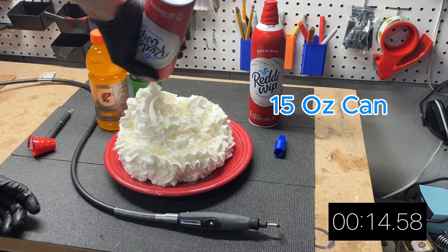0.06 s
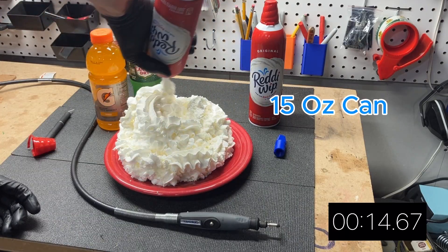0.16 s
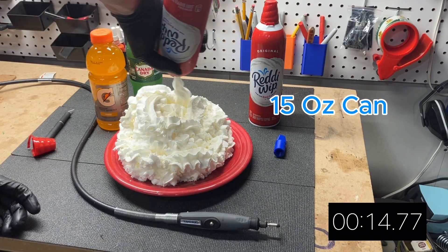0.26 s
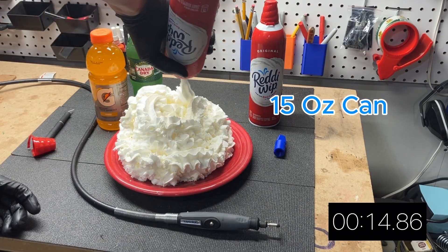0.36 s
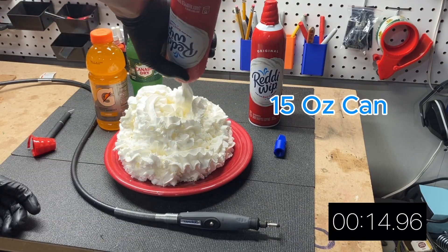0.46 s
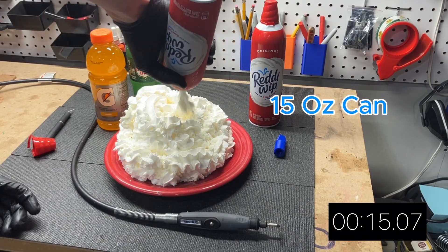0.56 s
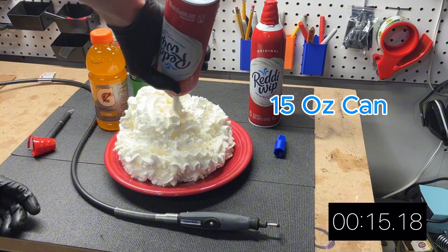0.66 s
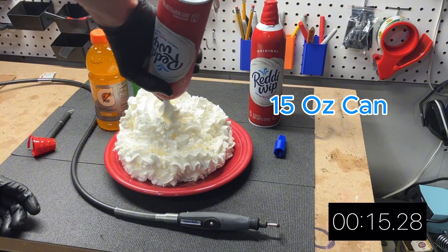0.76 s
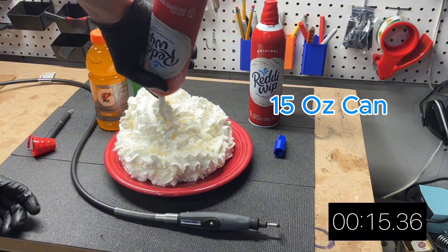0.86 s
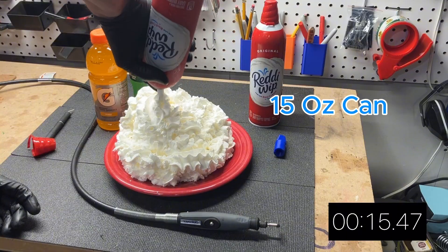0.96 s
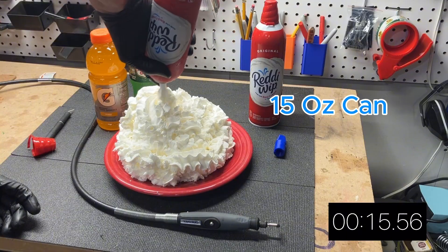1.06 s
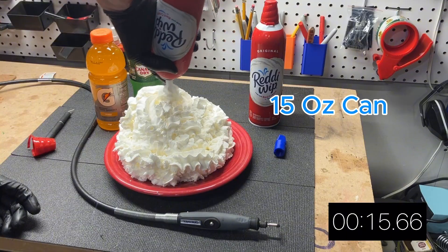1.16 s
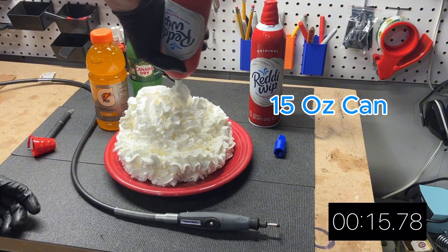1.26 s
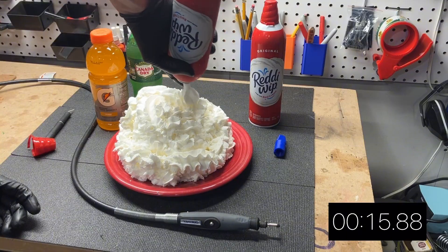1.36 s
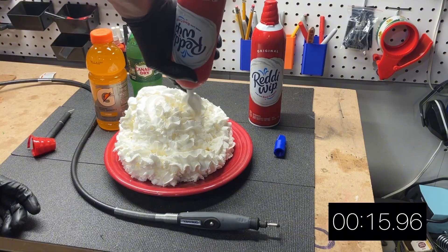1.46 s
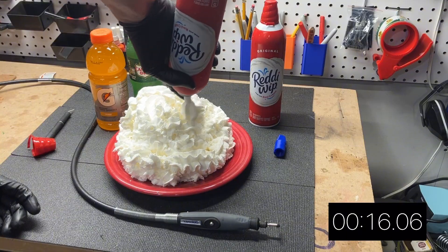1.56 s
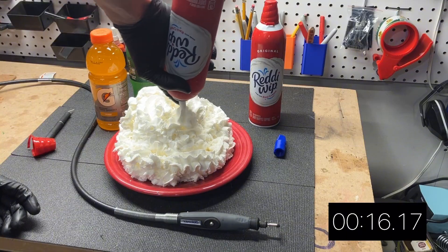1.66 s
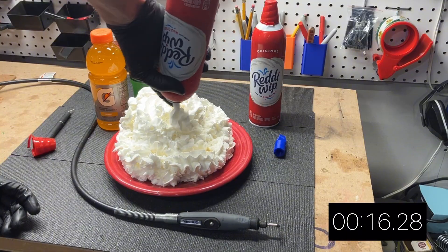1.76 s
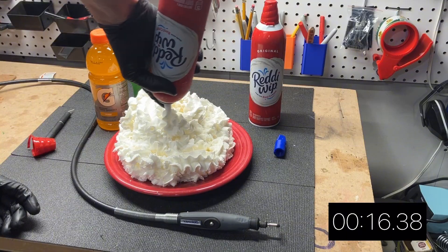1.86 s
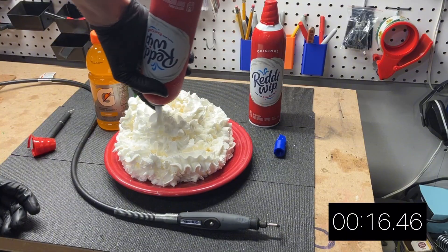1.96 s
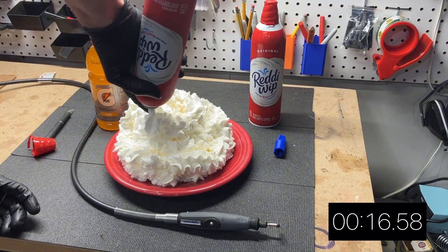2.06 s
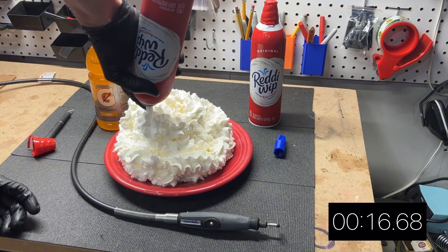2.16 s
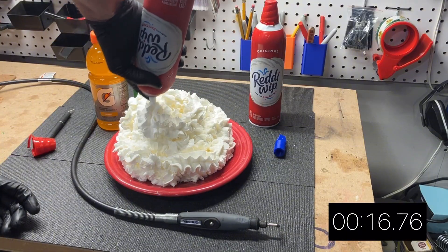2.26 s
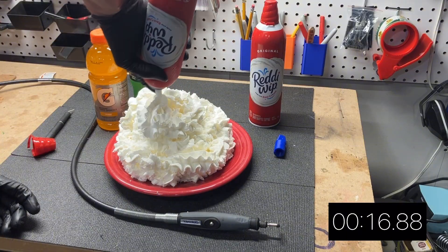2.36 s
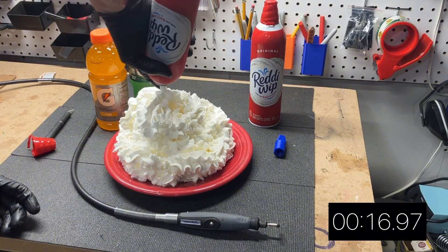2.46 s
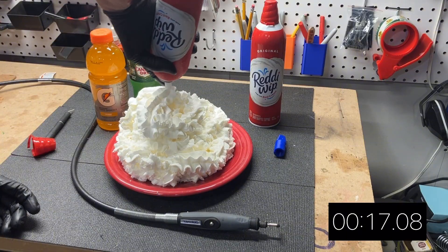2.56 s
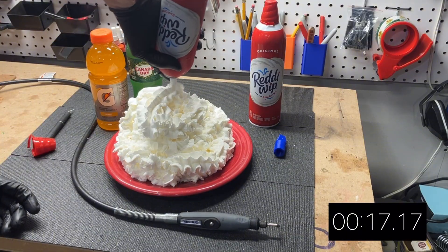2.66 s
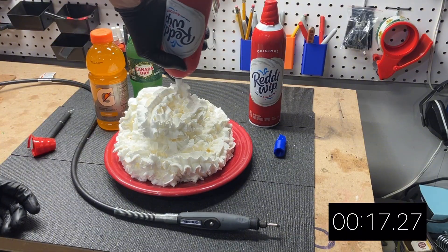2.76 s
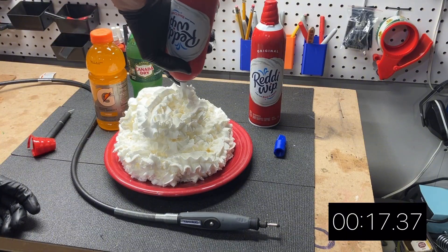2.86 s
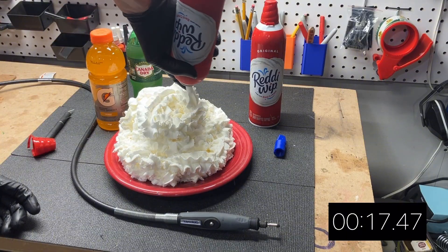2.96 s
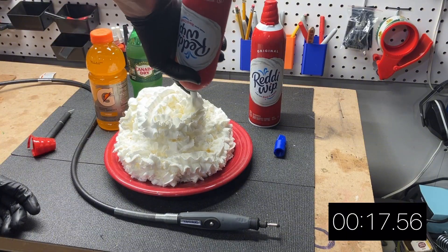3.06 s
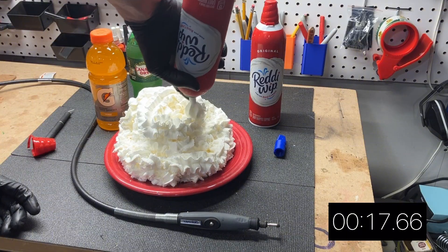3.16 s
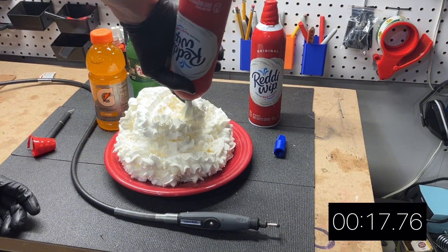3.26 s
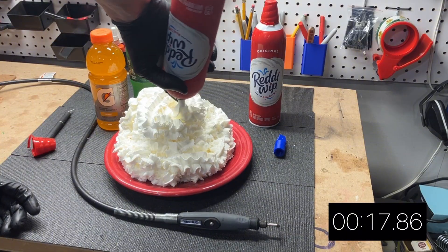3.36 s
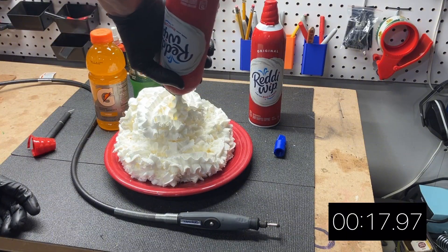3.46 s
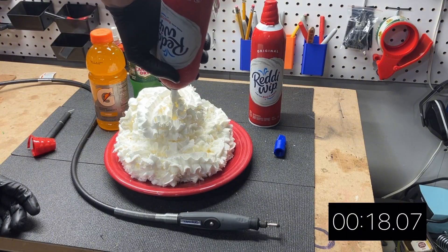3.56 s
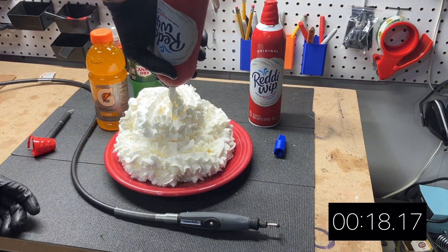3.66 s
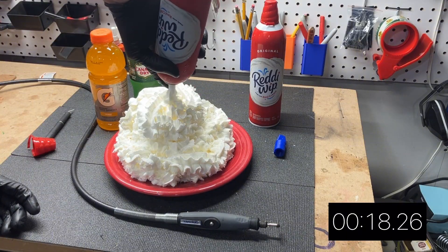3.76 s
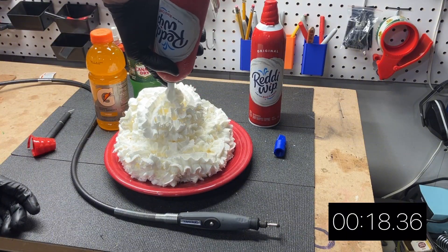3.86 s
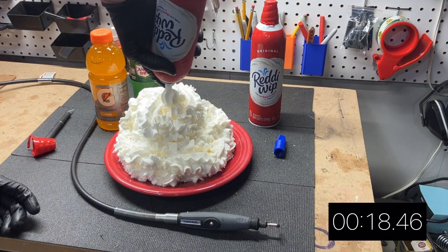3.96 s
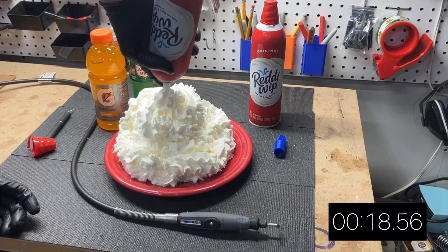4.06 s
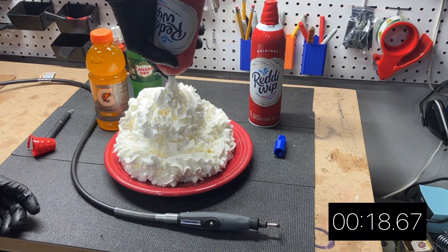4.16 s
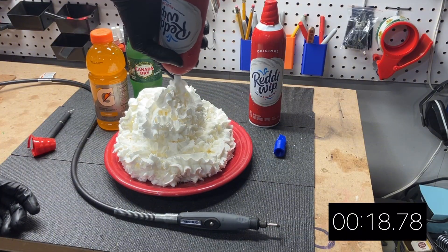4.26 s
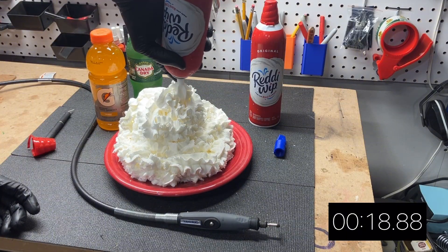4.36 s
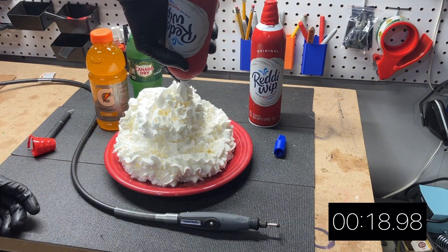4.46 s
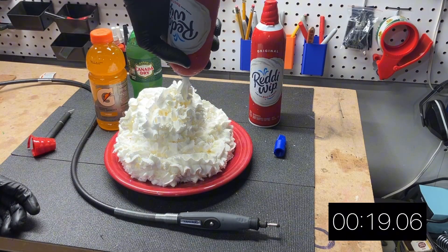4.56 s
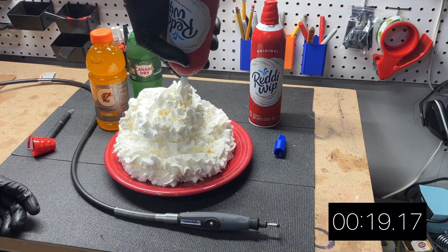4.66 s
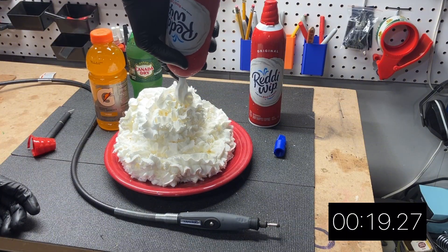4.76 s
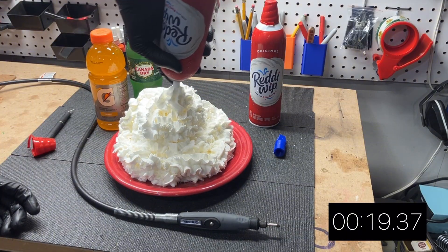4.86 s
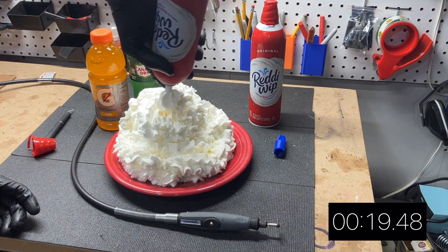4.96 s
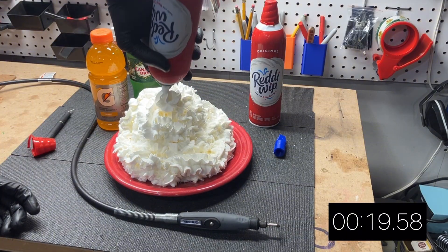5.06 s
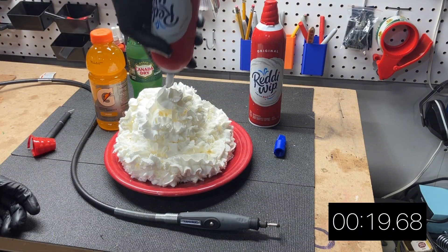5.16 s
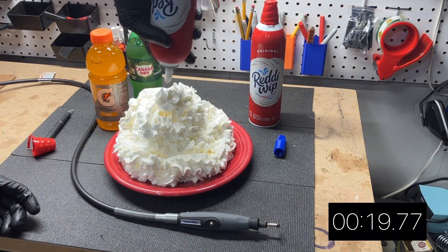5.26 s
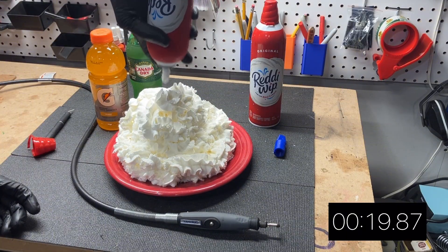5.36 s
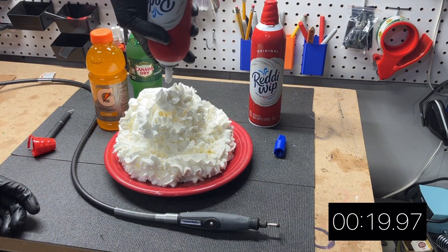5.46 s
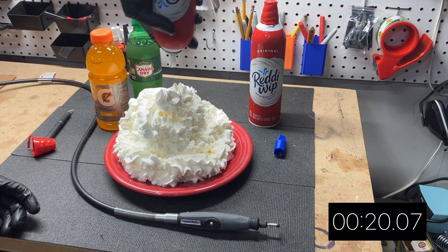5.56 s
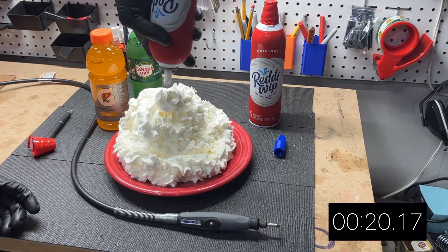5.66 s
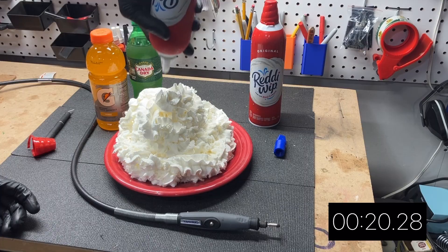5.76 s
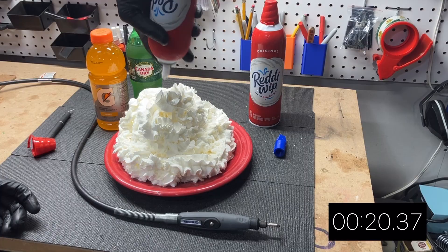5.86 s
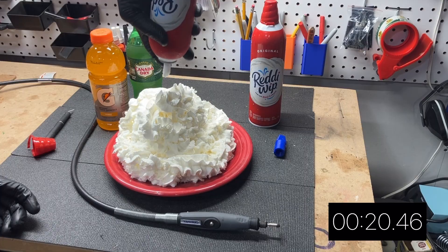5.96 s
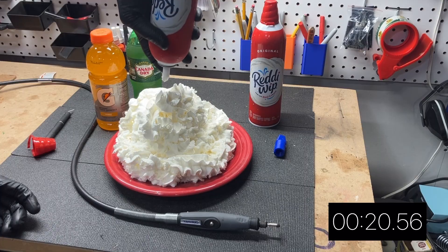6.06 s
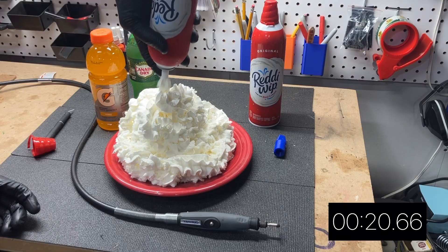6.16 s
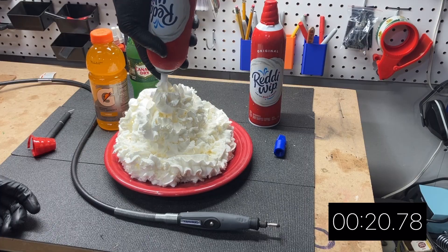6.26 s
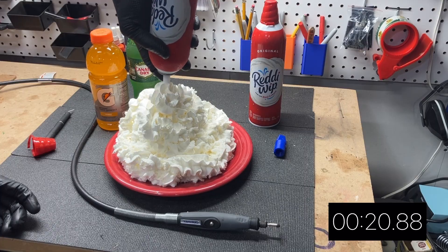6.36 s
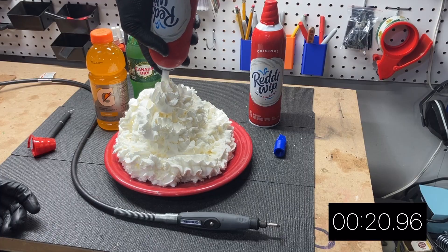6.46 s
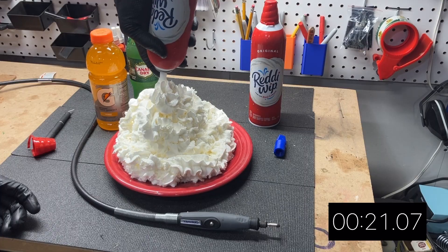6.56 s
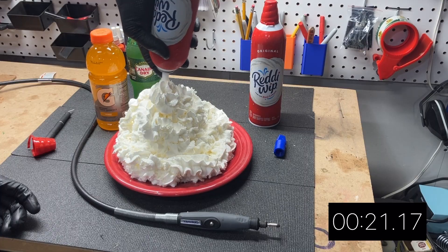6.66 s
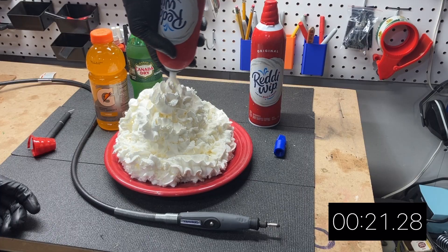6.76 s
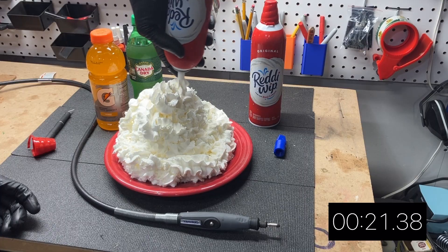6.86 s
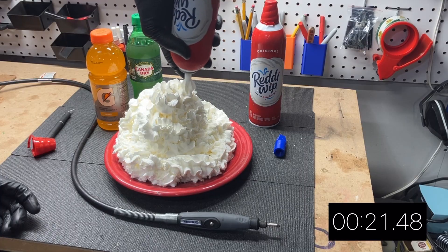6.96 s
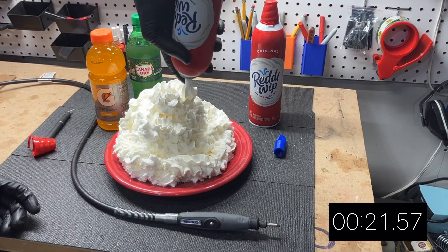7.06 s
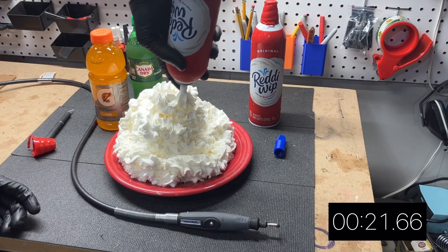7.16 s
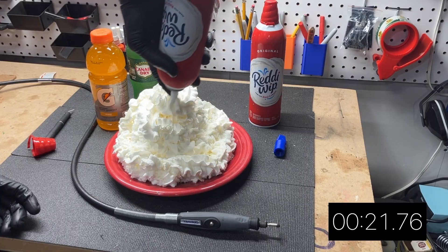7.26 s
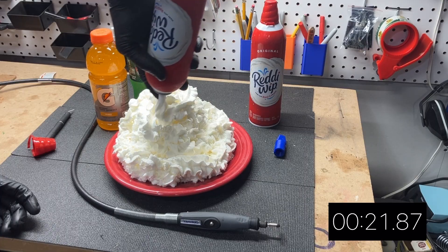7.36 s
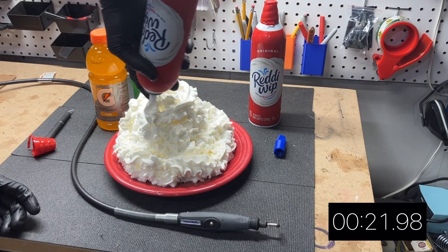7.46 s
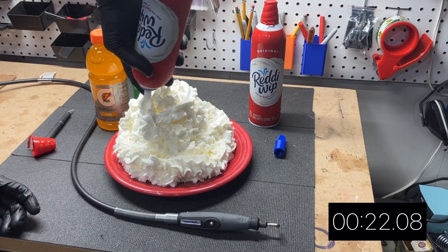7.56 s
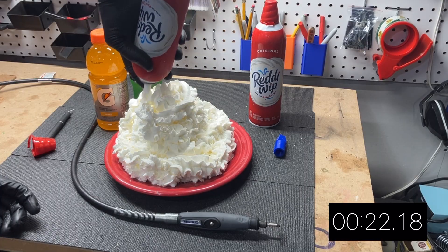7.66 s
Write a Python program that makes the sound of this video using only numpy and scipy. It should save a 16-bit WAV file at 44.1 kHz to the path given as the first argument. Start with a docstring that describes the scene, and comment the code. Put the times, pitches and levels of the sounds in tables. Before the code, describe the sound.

Close to the microphone in a small workshop, whipped cream rushes from a spray can, hissing and rasping with faint, brief whistles at the nozzle. The long first spray breaks into two shorter squirts, then stops for about a second, leaving a soft knock and a faint room rumble. Two more sprays follow, a little brighter, with small sputters as the can empties.

```python
"""A can of whipped cream sprays onto a heap of foam on a workbench, held open and then in short bursts.
Turbulent gas tears through the valve with a bright hiss, while bursting pockets in the cream excite
air resonances, a low rasp. Foam at the nozzle whistles briefly, and the emptying can spits.
Nearby surfaces reflect the spray and the small workshop reverberates over a faint rumble;
in the long pause the gloved hand knocks and rustles on the can."""
import sys
import numpy as np
from scipy import signal
from scipy.fft import rfft, irfft
from scipy.io import wavfile
from scipy.ndimage import uniform_filter1d

SR = 44100
rng = np.random.default_rng(int(sys.argv[2]) if len(sys.argv) > 2 else 0)


def dump(signal):
    """Clip the signal to [-1, 1] and save it as 16-bit WAV at the path in sys.argv[1]."""
    limited = np.clip(np.atleast_2d(signal).T, -1, 1)
    pcm = np.round(limited * 32767).astype(np.int16)
    wavfile.write(sys.argv[1], SR, pcm)


N = 340011
T = np.arange(N) / SR
F = np.fft.rfftfreq(N, 1 / SR) + 1e-6


def undb(db):
    """Amplitude ratio of a level in dB."""
    return 10 ** (np.asarray(db) / 20)


def unit(x):
    """Normalisation to rms 1."""
    return x / np.sqrt(np.mean(x ** 2))


def noise():
    """Gaussian white noise."""
    return rng.standard_normal(N)


def drift(rate_hz):
    """Low-pass random modulation: steps at rate_hz, smoothed twice, rms 1."""
    hold = int(SR / rate_hz)
    steps = np.repeat(rng.standard_normal(N // hold + 1), hold)
    return unit(uniform_filter1d(uniform_filter1d(steps, hold), hold)[:N])


def curve(table, column=1):
    """Interpolation of a table column over log frequency."""
    rows = np.array(table)
    return np.interp(np.log(F), np.log(rows[:, 0]), rows[:, column])


def resonance(hz, width_hz):
    """Frequency response of a damped oscillator, gain 1 at its centre."""
    return 1 / (1 + 1j * (F ** 2 - hz ** 2) / (F * width_hz))


def band(spectra, hz, width_hz):
    """Band-pass filtering by two equal resonances in cascade; a signal of rms 1."""
    return unit(irfft(spectra * resonance(hz, width_hz) ** 2, N))


def crossover(spectra, hz, low_db, high_db):
    """Complementary filters divide the sound at hz; each part takes its own level."""
    low = 1 / (1 + (F / hz) ** 8)
    below, above = unit(irfft(spectra * low, N)), unit(irfft(spectra * (1 - low), N))
    return undb(low_db) * below + undb(high_db) * above


# Correlation between the microphone ports: f/Hz, direct sound, diffuse sound
COHERENCE = [(60, 1, 1), (394, 1, 0.98), (655, 0.97, 0.89), (1300, 0.71, 0.8), (2400, 0.48, 0.57),
             (5050, 0.25, 0.39), (7550, 0.71, .4), (15000, 0.87, 0.25)]
def pair(source=noise, diffuse=False):
    """Partial coherence: left and right spectra as sum and difference of two independent signals."""
    alike = np.clip(curve(COHERENCE, 2 if diffuse else 1), 0, 1)
    mid = rfft(source()) * np.sqrt(1 + alike)
    side = rfft(source()) * np.sqrt(1 - alike)
    return np.array([mid + side, mid - side])


# Presses of the nozzle: opening t/s, closing t/s, rise time/s, fall time/s
PRESS_TIMES = [(-.1, 3.47, .05, .065), (3.674, 4.405, .05, .065), (4.66, 4.984, .06, .055),
               (6.032, 6.333, .065, .08), (6.435, 7.8, .075, .05)]
def valve(fall_share=1):
    """The aperture throttles the flow: 0 shut, 1 open; it closes in fall_share of the fall time."""
    ease = lambda u: np.sin(np.pi / 2 * np.clip(u, 0, 1)) ** 2
    return sum(ease((T - on) / rise) * ease(1 + (off - T) / (fall_share * fall))
               for on, off, rise, fall in PRESS_TIMES)


# Spectral density of the valve hiss: f/Hz, relative level/dB
HISS_SPECTRUM = [(4500, -45), (5600, -7.5), (7000, -2), (8100, -1.5), (9000, -2.5), (9600, 0),
                 (11000, -4.5), (12500, -8.5), (14000, -15), (16000, -16)]
def hiss(low_db, high_db, lag_s=0.0002197, phase_rad=3.06, patchy_db=0.56):
    """Turbulence in the valve gap hisses; it lies to the right, so the left port hears it later."""
    spectra = pair() * undb(curve(HISS_SPECTRUM))
    spectra[0] *= np.exp(-1j * (2 * np.pi * F * lag_s + phase_rad))
    return crossover(spectra, 9130, low_db, high_db) * undb(patchy_db * drift(300))


# Spectral density of the gas jet: f/Hz, relative level/dB
JET_SPECTRUM = [(120, -11), (300, -9.5), (1100, -2.5), (1600, -0.5), (2000, -3), (2700, 0), (3600, -1.5),
                (4300, -1), (5500, -4.5), (7000, -21.5)]
def jet(low_db, high_db, tube_db, patchy_db=1.0):
    """A turbulent jet, broken up by droplets, radiates broad noise and excites the tube's resonance."""
    turbulence = crossover(pair() * undb(curve(JET_SPECTRUM)), 2210, low_db, high_db)
    tube = band(pair(), hz=4850, width_hz=620)
    return (turbulence + undb(tube_db) * tube) * undb(patchy_db * drift(200))


# Modes of the air in nozzle, can and foam: f/Hz, bandwidth/Hz, relative level/dB
CAVITY_MODES = [(207.4, 30, -17.5), (351.4, 27, -6), (417.5, 20.3, -4.5), (496, 31, 1.5), (554, 61, -2.5),
                (649, 51, -1.5), (734, 45, -3.5), (840, 81, -4.5), (931, 32, -4), (1008, 25, -5.5)]
def froth(low_db, high_db, scatter_db=2.0, sputter_db=0.05):
    """Cavity resonance: gas pockets of uneven size burst and ring the air spaces around the nozzle."""
    pockets = lambda: noise() * undb(scatter_db * drift(900))
    modes = sum((-1) ** k * undb(db) * resonance(hz, width)
                for k, (hz, width, db) in enumerate(CAVITY_MODES))
    return crossover(pair(pockets) * modes, 713, low_db, high_db) * undb(sputter_db * drift(40))


# Reflections from bench, plate, bottles and pegboard: delay/ms, level/dB re direct sound
EARLY_REFLECTIONS = [(1.3, -13), (2.9, -14), (4.7, -13), (7.1, -13), (9.8, -14), (13.3, -14)]
def reflections(direct, sway_ms=0.207, sway_hz=2.5):
    """Comb filtering: short echoes interfere with the direct sound, shifting as the hand moves the can."""
    total, power = direct.copy(), 1
    for delay_ms, db in EARLY_REFLECTIONS:
        emitted_s = T - (delay_ms + sway_ms * drift(sway_hz)) / 1000
        total += undb(db) * np.array([np.interp(emitted_s, T, port) for port in direct])
        power += undb(2 * db)
    return total / np.sqrt(power)


# Reverberation of the workshop: f/Hz, T60/s, level/dB re direct sound
ROOM_BANDS = [(294, 0.35, -26), (745, 0.13, -11), (2040, 0.13, -13), (4970, 0.36, -13), (7850, 0.38, -15.5),
              (13000, 0.17, -14)]
def reverberation(direct, build_s=0.038):
    """A diffuse field decays exponentially: convolution with a dying noise in each band."""
    centres, t = np.array(ROOM_BANDS)[:, 0], T[:SR // 2]
    response = 0
    for k, (_, t60, db) in enumerate(ROOM_BANDS):
        decay = undb(-60 * t / t60) * np.clip(t / build_s, 0, 1)
        decay /= np.sqrt(2 * np.sum(decay ** 2))
        tail = lambda: np.pad(rng.standard_normal(len(t)) * decay, (0, N - len(t)))
        share = np.interp(np.log(F), np.log(centres), np.arange(len(centres)) == k)
        response += pair(tail, diffuse=True) * undb(db) * np.sqrt(share)
    return irfft(rfft(direct.mean(axis=0)) * response, N)


# Spectral density of the room tone: f/Hz, relative level/dB
AMBIENT_SPECTRUM = [(20, -7.5), (64, -5.5), (126, -14), (160, -10), (260, -20.5), (505, -22.5),
                    (600, -26.5), (2000, -33), (5000, -36), (12400, -40.5), (16000, -42)]
# Swell of the rumble: t/s, level/dB
RUMBLE_LEVELS = [(0, -63), (.5, -59), (1.5, -62), (2.5, -61), (3.3, -57), (5.0, -62), (5.75, -56),
                 (6.05, -59.5), (7.2, -57.5), (7.71, -57)]
def room_tone(tone_db=-61, hum_hz=58, hum_re_rumble_db=-5):
    """Diffuse background noise over a swelling rumble; a narrow noise band makes a wavering hum."""
    spectra = pair(diffuse=True) * undb(curve(AMBIENT_SPECTRUM))
    rumble_db = np.interp(T, *np.transpose(RUMBLE_LEVELS))
    hum = unit(irfft(rfft(noise()) / (1 + ((F - hum_hz) / 4) ** 2), N))
    ambience = crossover(spectra, 117, rumble_db, tone_db + 0.65 * drift(3.35))
    return ambience + undb(rumble_db + hum_re_rumble_db) * hum


# Hollow notes at the nozzle mouth: centre t/s, duration/s, f/Hz, resonance width/Hz, peak level/dB
WHISTLE_NOTES = [(0.892, 0.33, 2950, 120, -46), (1.948, 0.25, 2830, 120, -46.5),
                 (3.06, 0.12, 3035, 90, -40), (3.857, 0.18, 2940, 120, -44), (7.3, 0.87, 2600, 120, -45)]
def whistles():
    """Flow-excited resonance: narrow bands of noise swell and fade as foam constricts the mouth."""
    rush = pair()
    return sum(undb(db) * np.exp(-(2 * (T - centre) / length) ** 2) * band(rush, hz, width)
               for centre, length, hz, width, db in WHISTLE_NOTES)


# The hand's knock on the can: t/s, level/dB, f/Hz, T60/s
HAND_IMPACTS = [(5.262, -52, 484, .06)]
def knock(rise_s=0.0037):
    """Free vibration: a soft impact excites one damped mode."""
    sound = 0
    for start, db, hz, t60 in HAND_IMPACTS:
        age = np.clip(T - start, 0, 1)
        envelope = undb(db - 60 * age / t60) * np.clip(age / rise_s, 0, 1)
        sound += envelope * np.sin(2 * np.pi * hz * T)
    return sound


def rustle(centre_s=5.65, length_s=0.4, level_db=-68.5, patchy_db=3.5):
    """Friction noise: the glove brushes the can in one dull, patchy swell."""
    brush = band(pair(diffuse=True), hz=550, width_hz=700)
    swell = np.exp(-(2 * (T - centre_s) / length_s) ** 2)
    return undb(level_db + patchy_db * drift(30)) * swell * brush


# Gas pockets passing the valve as the can runs low: t/s, level/dB
GAS_POCKETS = [(6.28, -22), (7.048, -25), (7.068, -23), (7.143, -22), (7.203, -21), (7.269, -25),
               (7.337, -26), (7.472, -25), (7.529, -27), (7.654, -22), (7.668, -24)]
def spits(t60=0.023, rise_s=0.0009):
    """Transient turbulence: each pocket gives a bright puff of hiss that decays exponentially."""
    puffs, t = np.zeros(N + SR), T[:SR // 20]
    for start, db in GAS_POCKETS:
        puffs[int(start * SR):][:len(t)] += undb(db - 60 * t / t60) * np.clip(t / rise_s, 0, 1)
    return puffs[:N] * unit(irfft(pair() * undb(curve(HISS_SPECTRUM)), N))


# As the can empties, more gas escapes and the rasp swells, sinks and turns hollower:
# t/s, gas drive/dB, lower froth level/dB, upper re lower froth/dB, lower jet level/dB, top hiss level/dB
SPRAY_LEVELS = [(0, 0, -39.5, -8.5, -44.5, -38.5), (.7, 1, -39.5, -4.5, -42.5, -38),
                (1.301, 1, -39, -8, -41.5, -38.5), (1.75, 0.5, -39, -1, -41.5, -36.5),
                (2.15, 1.5, -33.5, -5.5, -41.5, -35.5), (2.7, 2.5, -37.5, -5.5, -39, -36),
                (3.45, 2.5, -37.5, -3, -42, -36), (3.75, 3.5, -37.5, -2, -42, -34.5),
                (4.15, 4, -37.5, -4, -37, -34), (4.45, 3, -41.5, -0.5, -40.5, -33.5),
                (4.95, 4.5, -37, -3, -40, -32.5), (6.1, 5, -38.5, -3, -41, -32.5),
                (6.55, 3.5, -39, -3.5, -37.5, -34.5), (6.95, 6, -41.5, 0, -38, -34),
                (7.3, 6, -38, 2, -38, -34), (7.71, 6.5, -35, 0.5, -38, -36)]
def scene():
    """Superposition of gas and cream, both gated by the valve, with the room and the hand."""
    times, *columns = np.transpose(SPRAY_LEVELS)
    drive_db, froth_db, upper_db, jet_db, top_db = [np.interp(T, times, c) for c in columns]
    # three gas layers follow the drive, each with its own slope and slow drift
    driven_db = lambda base_db, slope: base_db + slope * drive_db + 0.92 * drift(4)
    opening = valve()
    gas = opening ** 1.7 * jet(jet_db, high_db=driven_db(-41.5, 1.12), tube_db=driven_db(-44, 0.4))
    gas += opening ** 1.38 * hiss(driven_db(-39.5, 1.06), top_db)
    spray = reflections(gas + spits()) + whistles()
    # the cream needs a wider opening than the gas, so it stops sooner
    spray += valve(fall_share=0.56) ** 1.45 * froth(froth_db, froth_db + upper_db)
    return spray + reverberation(spray) + room_tone() + knock() + rustle()


# Imbalance of the microphone ports: f/Hz, left minus right level/dB
PORT_BALANCE = [(700, 0), (1300, 1.5), (2400, .5), (4400, 0), (8000, -1), (15000, 0.5)]
def record(dry, cutoff_hz=15700):
    """Frequency response of the microphone: two slightly unequal ports and a steep low-pass."""
    lean = undb(curve(PORT_BALANCE) / 2)
    ports = irfft(rfft(dry) * np.array([lean, 1 / lean]), N)
    return signal.sosfilt(signal.ellip(12, 0.2, 80, cutoff_hz, fs=SR, output="sos"), ports)


dry = scene()
out = record(dry)
dump(out)
```